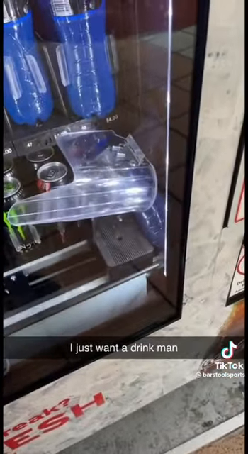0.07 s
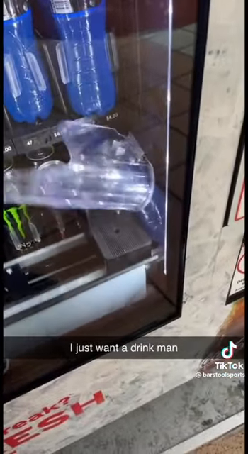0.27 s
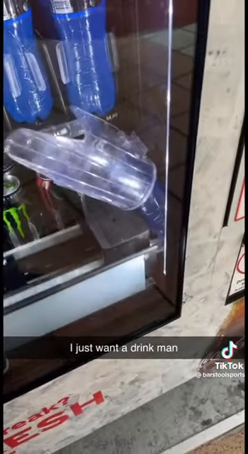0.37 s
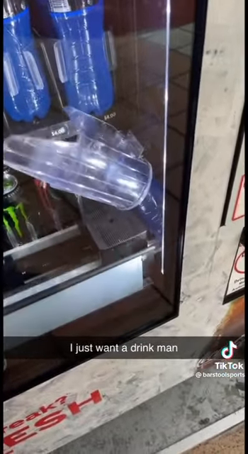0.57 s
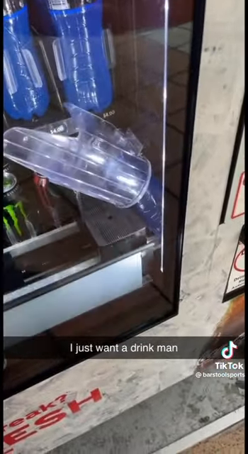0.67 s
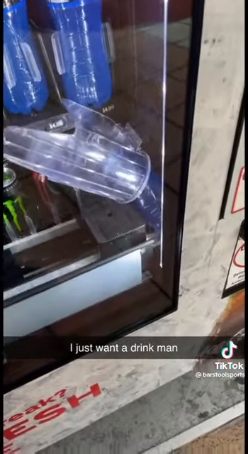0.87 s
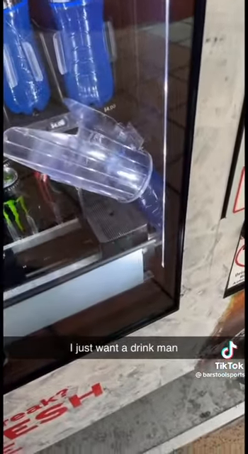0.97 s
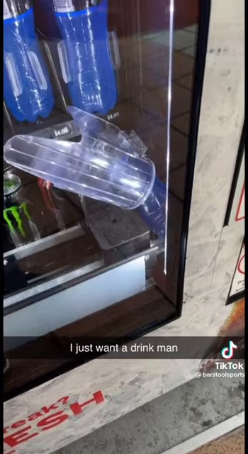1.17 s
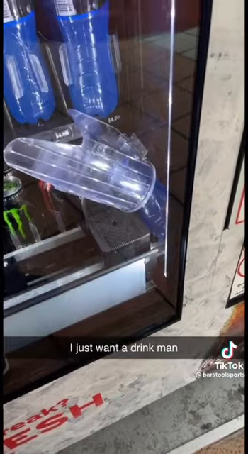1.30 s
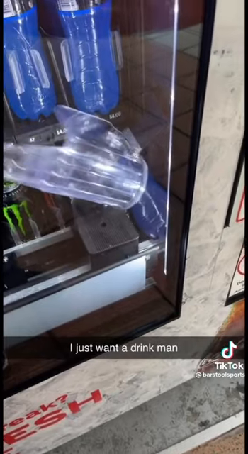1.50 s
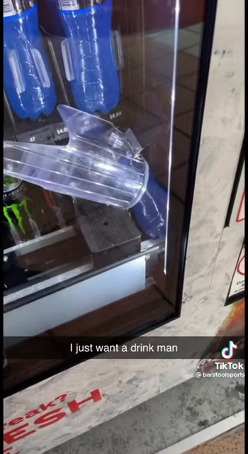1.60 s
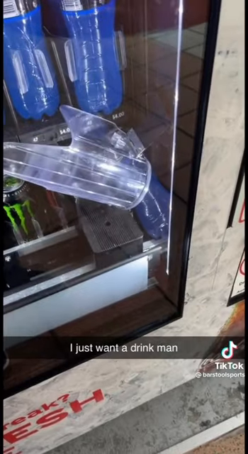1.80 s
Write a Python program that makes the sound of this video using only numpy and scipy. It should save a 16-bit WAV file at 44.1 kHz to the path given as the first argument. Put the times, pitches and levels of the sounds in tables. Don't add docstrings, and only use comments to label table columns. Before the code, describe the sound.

Loud geared grinding and rattling plastic inside a vending machine, followed by a brief weaker whirr

```python
import sys
import numpy as np
from scipy import signal
from scipy.fft import rfft, irfft, next_fast_len
from scipy.io import wavfile
from scipy.ndimage import uniform_filter1d, minimum_filter1d

SR = 44100
rng = np.random.default_rng(int(sys.argv[2]) if len(sys.argv) > 2 else 0)


def decibels_to_gain(level_db):
    exponent = np.asarray(level_db, float) / 20
    return 10 ** exponent


def store_pcm(level_fs):
    pcm = np.round(np.clip(level_fs, -1, 1) * 32767).astype(np.int16)
    wavfile.write(sys.argv[1], SR, np.atleast_2d(pcm).T)


N = 81585

# (frequency [Hz], level [dB], t60 [s])
CRADLE_MODES = [(2170, -11, .022), (2440, 0, .03), (2540, -7, .02), (2780, -8, .018), (3050, -10, .014),
                (3480, -15, .014), (5050, -8, .012), (5700, -14, .012)]


def rms_one(x):
    return x / np.sqrt(np.mean(x ** 2) + 1e-20)


def in_time(rows):
    s, *columns = np.transpose(rows)
    return [np.interp(np.arange(N) / SR, s, column) for column in columns]


def drift(rate_hz):
    r = np.exp(-80 * np.pi * rate_hz / SR)
    white = rng.standard_normal(N // 40 + 2002)
    slow = signal.lfilter([1], [1, -2 * r, r * r], white)[2000:]
    return np.interp(np.arange(N) / 40, np.arange(len(slow)), rms_one(slow - slow.mean()))


def resonate(x, hz, width_hz):
    r = np.exp(-np.pi * width_hz / SR)
    poles = [1, -2 * r * np.cos(2 * np.pi * hz / SR), r * r]
    return signal.lfilter([(1 - r * r) / 2, 0, (r * r - 1) / 2], poles, x + 1e-18)


def bands(white, spectrum, patchy_db, tilt_db=0, middle_db=0):
    out = 0
    together = drift(14)
    edges = 22 * 2 ** np.arange(0, 9.1, 1 / 3)
    hz, db = np.transpose(spectrum)
    for k, (low, high) in enumerate(zip(edges, edges[1:])):
        band_pass = signal.butter(2, [low, high], "band", fs=SR, output="sos")
        band = signal.sosfilt(band_pass, white[k % 2])
        mid = np.sqrt(low * high)
        level = np.interp(np.log(mid), np.log(hz), db)
        level = level + tilt_db * np.clip(np.log2(mid / 1300), 0, 1)
        level = level + middle_db * (550 < mid < 2000)
        out = out + band * decibels_to_gain(level + patchy_db * (0.4 * together + drift(29.4)))
    return out


def ambience():
    # (frequency [Hz], density [dB per Hz])
    rumble_spectrum = [(15, -55.5), (25, -20), (104, -4.5), (274, -11), (303, -12.5), (440, -10.5),
                       (1320, -28.5), (6180, -45.5), (9680, -86), (12600, -71.5), (21300, -120)]
    # (time [s], rumble level [dB], hum level [dB])
    ambient_levels = [(0, -28, -25.5), (.06, -24, -48), (.14, -27.5, -33), (.22, -24.5, -31.5),
                      (.5, -22.5, -28), (.92, -27.5, -39), (1.0, -28, -28), (1.1, -27.5, -29),
                      (1.15, -30, -32), (1.21, -25, -42), (1.28, -25, -28), (1.35, -24, -30),
                      (1.6, -28, -32.5), (1.68, -29, -27.5), (1.74, -27.5, -24), (1.85, -29, -38)]
    hum_hz, hum_wander_hz, octave_db = 101, 8, -12
    whine_hz, whine_width_hz, whine_db = 960, 2.4, -48
    box_hz, box_width_hz, box_db = 461.7, 22.4, -10

    rumble_db, hum_db = in_time(ambient_levels)
    phase = 2 * np.pi * np.cumsum(hum_hz + hum_wander_hz * drift(7.9)) / SR
    hum_level = np.sqrt(2) * decibels_to_gain(hum_db + 1.2 * drift(27))
    octave = decibels_to_gain(octave_db + 4.6 * drift(39)) * np.sin(2 * phase)
    hum = hum_level * (np.sin(phase) + octave)
    whine = decibels_to_gain(whine_db) * rms_one(resonate(rng.standard_normal(N), whine_hz, whine_width_hz))
    boxy = decibels_to_gain(box_db) * rms_one(resonate(rng.standard_normal(N), box_hz, box_width_hz))
    rumble = rms_one(bands(rng.standard_normal((2, N)), rumble_spectrum, patchy_db=2.0))
    return decibels_to_gain(rumble_db) * (rumble + boxy) + hum + whine


def spin_up():
    # (time [s], frequency [Hz], level [dB])
    motor_run = [
        (.06, 466, -47),
        (.09, 512, -40),
        (.12, 574, -28.5),
        (.15, 694, -45),
        (.166, 728, -31),
        (.206, 806, -38),
        (.235, 857, -46.5),
    ]
    roughness_hz, half_db = 9.8, 3.0
    hz, db = in_time(motor_run)
    phase = 2 * np.pi * np.cumsum(hz + roughness_hz * drift(60)) / SR
    level = decibels_to_gain(db + 4.4 * drift(53))
    unloaded = np.arange(N) < motor_run[-1][0] * SR
    return level * (np.sin(phase) + decibels_to_gain(half_db) * np.sin(phase / 2)) * unloaded


def cradle(x, strength_db):
    out = 0
    for k, ((hz, db, t60), extra_db) in enumerate(zip(CRADLE_MODES, strength_db)):
        width = np.log(1000) / np.pi / t60
        out = out + resonate(x, hz, width) * np.sqrt(SR / width / 10) * decibels_to_gain(db + extra_db) * (-1) ** k
    return out


def panels(x, flicker_db, lean_db=0):
    mode_hz = [190, 215, 280, 322, 378, 433, 472, 530, 680, 790, 868, 972, 1205, 1400]
    # (bandwidth [Hz], level [dB])
    mode_shape = [(21.9, -2.5), (22.2, -2.5), (18.3, -5), (19.3, -6), (24.3, -11), (16, -4), (21.55, -9),
                  (28.08, -22), (15.8, -12.5), (21.4, -23.5), (26, -11), (26, -10), (29.5, -13),
                  (38.7, -20.5)]
    lean_hz = 350
    out = 0
    for k, (hz, (width, db)) in enumerate(zip(mode_hz, mode_shape)):
        lean = lean_db * (hz > 250) * np.tanh(3 * np.log2(hz / lean_hz))
        drive = x * decibels_to_gain(flicker_db * drift(3.5) + lean)
        out = out + resonate(drive, hz, width) * decibels_to_gain(db) * (-1) ** k
    return out


def clacks():
    # (time [s], rasp level [dB], ring level [dB], rasp decay [s], rasp centre [Hz])
    impacts = [(0.1, -42, -53, 0.014, 5940), (0.187, -53, -43, .01, 2470), (0.2444, -34, -24, 0.0046, 5200),
               (0.271, -31.5, -32, 0.0056, 4630), (0.386, -29, -27, 0.0069, 2900),
               (0.4392, -35.5, -20, 0.002, 2870), (.499, -37.5, -22, .015, 5420),
               (0.561, -40.5, -15.5, 0.0052, 5050), (0.632, -28.5, -40, 0.0093, 3560),
               (0.6895, -25, -23.5, 0.021, 3000), (0.724, -30, -35, 0.017, 6800),
               (0.7585, -39, -36, 0.0088, 2480), (0.913, -44.5, -40, 0.04, 4000),
               (0.985, -43.5, -64, 0.036, 5840), (0.996, -47.5, -38, 0.0089, 4480),
               (1.071, -37, -40, 0.017, 3900), (1.249, -28.5, -39, .006, 4440),
               (1.251, -30, -40, 0.0089, 1590), (1.296, -36.5, -30.5, 0.072, 5530),
               (1.396, -41, -34, 0.0095, 3480), (1.415, -32, -31, 0.026, 5740),
               (1.495, -40, -30.5, 0.013, 4900), (1.5633, -42.5, -38, 0.0054, 2820),
               (1.7175, -47.5, -37.5, 0.079, 4960)]
    chatter_s, mode_spread_db, thud_db = .0053, 1.5, 11.5
    rasp_width_hz, rasp_broad_db, rasp_rise_s = 900, -1, .0015
    stop_s, stop_hz, stop_db, stop_t60_s = .838, 130, -15, .1

    t = np.arange(int(.1 * SR)) / SR
    out, thuds = np.zeros(N + SR), np.zeros(N + SR)
    broad_pass = signal.butter(2, [1300, 6500], "band", fs=SR, output="sos")
    for s, rasp_db, ring_db, rasp_s, rasp_hz in impacts:
        i = int(s * SR)
        noise = rng.standard_normal((3, len(t)))
        strength_db = rng.normal(0, mode_spread_db, len(CRADLE_MODES))
        chatter = noise[0] * np.exp(-t / chatter_s)
        ring = cradle(chatter, strength_db)
        broad = rms_one(signal.sosfilt(broad_pass, noise[1]))
        rasp = rms_one(resonate(noise[2], rasp_hz, rasp_width_hz)) + decibels_to_gain(rasp_broad_db) * broad
        rasp = rasp * np.exp(-t / rasp_s) * np.minimum(t / rasp_rise_s, 1)
        out[i:i + len(t)] += decibels_to_gain(ring_db + 3) * ring / np.abs(ring).max() + decibels_to_gain(rasp_db - 6) * rasp
        thuds[i:i + len(t)] += decibels_to_gain(rasp_db + thud_db) * chatter
    i = int(stop_s * SR)
    out[i:i + len(t)] += decibels_to_gain(stop_db - 60 * t / stop_t60_s) * np.sin(2 * np.pi * stop_hz * t)
    return out[:N] + panels(thuds[:N], flicker_db=2.5)


def teeth():
    contacts_per_s, spread_db = 1800, 2.5
    sizes = decibels_to_gain(spread_db * np.minimum(rng.exponential(1, N), 4)) * rng.choice([-1, 1], N)
    struck = rng.random(N) < contacts_per_s / SR
    return rms_one(sizes * struck + 0.12 * rng.standard_normal(N))


def grind():
    # (time [s], level [dB], brightness [dB], lean to upper panels [dB], mesh tone [dB])
    strokes = [
        [(.231, -65.5, 6.5, 15.5, -21), (.239, -5, 0, -0.5, -7), (.268, -10, -2.5, -4, -29),
         (.305, -9, 2.5, 8.5, -11), (.345, -8.5, 1.5, 7.5, -2), (.40, -9.5, 3, 4.5, -11),
         (.44, -8.5, -2, -7.5, -10.5), (.485, -11.5, -2.5, 8, -9.5)],
        [(.485, -16, 6.5, 17.5, -22.5), (.505, -8.5, 1.5, 7.5, -23.5), (.56, -7, 1.5, 2.5, -20),
         (.61, -10, 1.5, 0, -15), (.665, -6, 0, 0, -8), (.71, -11.5, 1, -6, -25.5), (.74, -6, -2, -4.5, -13.5),
         (.79, -19, -5.5, -19.5, -16), (.805, -32, -14, -8.5, -26), (.845, -28, -12.5, -14.5, -26),
         (.88, -46, -1.5, -8.5, -26)],
        [(1.283, -38, 22, -7.5, -20), (1.307, -14, -1.5, 1, -21), (1.345, -30, -2.5, -16.5, -32),
         (1.38, -38, 3.5, -1.5, -25), (1.40, -24.5, 8.5, 1.5, -23), (1.45, -25.5, 9, 2.5, -20),
         (1.51, -23, 7.5, -0.5, -18), (1.575, -27, 4, -11.5, -33), (1.605, -46, -2, -9.5, -34)],
    ]
    # (frequency [Hz], density [dB per Hz])
    grind_spectrum = [(35, -50.5), (70, -13.5), (400, -6), (1000, -9), (2010, -24.5), (3750, -34.5),
                      (5400, -34), (9680, -53), (12600, -68)]
    panel_db, body_db = -8.5, -6
    buzz_db, buzz_flicker_db = -35, 3.5
    mesh_hz, mesh_wander_hz, mesh_share_db = 465, 18.0, -7

    t = np.arange(N) / SR
    controls = np.zeros((4, N))
    controls[0] = -120
    for rows in strokes:
        on = (t >= rows[0][0]) & (t <= rows[-1][0])
        controls[:, on] = np.array(in_time(rows))[:, on]
    load_db, bright_db, lean_db, mesh_db = controls

    contacts = [teeth(), teeth()]
    body = bands(contacts, grind_spectrum, patchy_db=1.5, tilt_db=bright_db, middle_db=0.38 * lean_db)
    ring = rms_one(panels(contacts[0], flicker_db=0.0, lean_db=lean_db))
    shaken = contacts[1] * decibels_to_gain(buzz_flicker_db * drift(16))
    buzz = rms_one(cradle(shaken, np.zeros(len(CRADLE_MODES)))) * decibels_to_gain(buzz_db + bright_db)
    mesh_level = np.sqrt(2) * decibels_to_gain(mesh_db + mesh_share_db + 3 * drift(30))
    mesh = mesh_level * np.sin(2 * np.pi * np.cumsum(mesh_hz + mesh_wander_hz * drift(25)) / SR)
    return decibels_to_gain(load_db) * (decibels_to_gain(panel_db) * ring + decibels_to_gain(body_db) * rms_one(body) + buzz + mesh)


def jolts():
    # (time [s], peak level [dB], panel frequency [Hz])
    catches = [(0.2413, -12, 437), (0.26, -16, 336), (0.3083, -10.5, 379), (0.3225, -10.5, 254),
               (0.3382, -3, 455), (0.3433, -14, 310), (0.3573, -13, 894), (0.362, -7, 475),
               (0.3736, -12.5, 314), (0.381, -10.5, 990), (0.3971, -9.2, 468), (0.4, -12, 943),
               (0.4106, -6.5, 292), (0.419, -18.5, 465), (0.4307, -8, 226), (0.4407, -15.5, 377),
               (0.466, -11, 257), (0.4884, -7, 440), (0.5094, -8, 281), (0.5089, -4.5, 446),
               (0.5291, -18, 967), (0.5325, -10, 688), (0.537, -3.5, 464), (0.549, -20.5, 980),
               (0.5541, -17.5, 694), (0.5631, -8, 305), (0.5719, -7.5, 462), (0.5928, -9, 467),
               (0.5934, -9, 670), (0.6333, -14.5, 324), (0.6452, -12, 694), (0.6451, -11, 945),
               (0.6473, -9, 465), (0.6553, -13.5, 295), (0.6676, -19, 783), (0.6697, -5, 467),
               (0.6746, -14, 902), (0.6959, -9.5, 425), (0.7362, -12.5, 448), (0.7547, -19, 398),
               (1.3242, -15, 312), (1.3427, -18.5, 323), (1.3452, -16, 184), (1.378, -19, 182),
               (1.3946, -25, 580), (1.416, -28, 454), (1.4315, -24, 365), (1.456, -22.4, 408),
               (1.4723, -20.5, 420), (1.485, -15, 285), (1.4913, -22.5, 472), (1.511, -23, 287),
               (1.523, -20, 362), (1.5486, -27.5, 330), (1.5713, -28.5, 311), (1.578, -21.5, 208),
               (.2475, -8.5, 231), (.288, -14.5, 199), (.325, -8, 523), (0.583, -12, 293), (.5925, -11, 262),
             (0.6973, -14, 288), (0.621, -15, 200), (.715, -17.5, 217), (.741, -19.5, 1158),
             (.765, -13.5, 206), (.79, -21.5, 405), (1.3108, -19, 235), (1.312, -28.5, 1090),
             (1.526, -18.5, 130)]
    decay_s, level_db, tilt_db = .0052, -1, -1
    t = np.arange(int(.06 * SR)) / SR
    out = np.zeros(N + SR)
    swell = (t / decay_s / 2) ** 2 * np.exp(2 - t / decay_s)
    for s, db, hz in catches:
        i = int((s - 2 * decay_s) * SR)
        level = decibels_to_gain(db + level_db + tilt_db * np.log2(hz / 450))
        out[i:i + len(t)] += level * swell * np.cos(2 * np.pi * hz * (t - 2 * decay_s))
    return out[:N]


def room(x):
    t60_s = 0.28
    size = next_fast_len(N + SR)
    hz = np.arange(size // 2 + 1) * SR / size
    response = 0
    for k, lag in enumerate(rng.uniform(.02, .05, 10)):
        loop = decibels_to_gain(-60 * lag / t60_s * (0.5 + hz / 2000)) * np.exp(-2j * np.pi * hz * lag)
        response = response + loop / (1 - loop) * (-1) ** k
    return irfft(rfft(x, size) * response, size)[:N]


def scene():
    reverb_db = -13.5
    machine = grind() + clacks() + jolts()
    return (machine + decibels_to_gain(reverb_db) * room(machine) + ambience() + spin_up())[None]


def top_cut(x):
    return signal.sosfilt(signal.butter(12, 9830, fs=SR, output="sos"), x)


def record(dry):
    stop_hz, limit, limit_s, clip_level = 10540, 1.015, .004, 1.03
    x = signal.sosfilt(signal.butter(2, 32.0, "high", fs=SR, output="sos"), dry)
    x = signal.sosfilt(signal.cheby2(10, 50, stop_hz, fs=SR, output="sos"), x)
    span = int(limit_s * SR)
    gain = minimum_filter1d(np.minimum(1, limit / (np.abs(x) + 1e-9)), span, axis=-1)
    x = x * uniform_filter1d(gain, span, axis=-1)
    mix = np.clip(x, -clip_level, clip_level)
    return top_cut(mix)


dry = scene()
out = record(dry)
store_pcm(out)
```